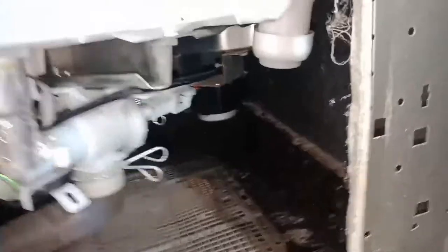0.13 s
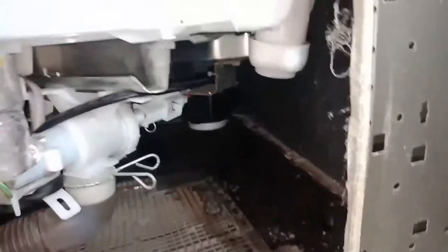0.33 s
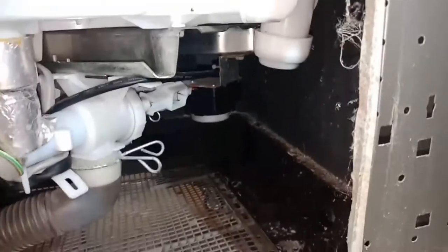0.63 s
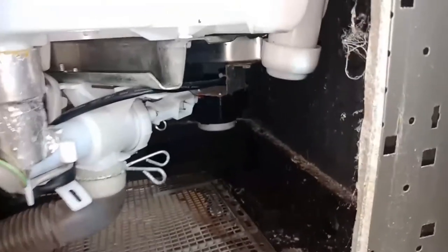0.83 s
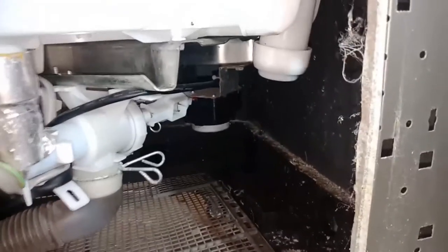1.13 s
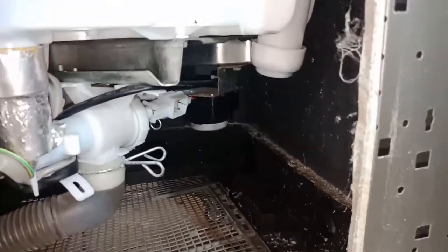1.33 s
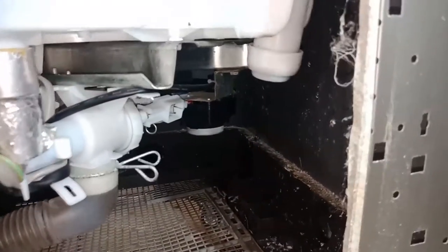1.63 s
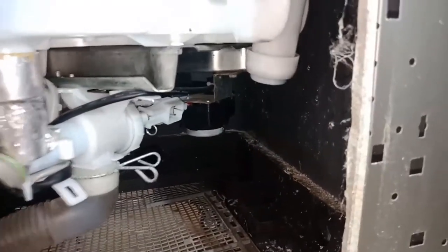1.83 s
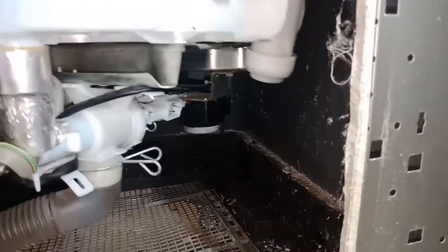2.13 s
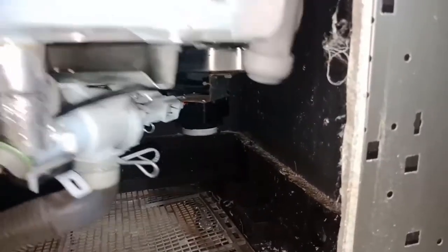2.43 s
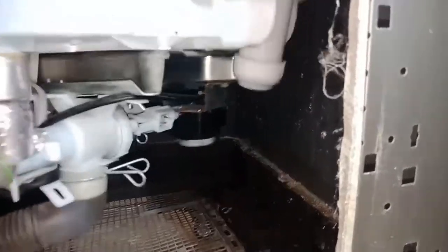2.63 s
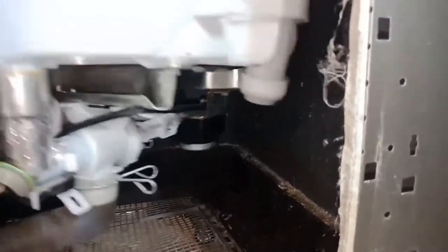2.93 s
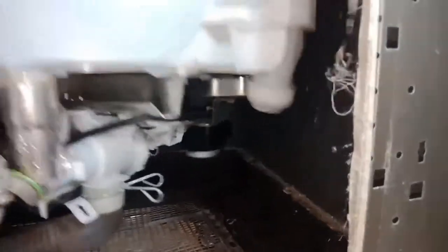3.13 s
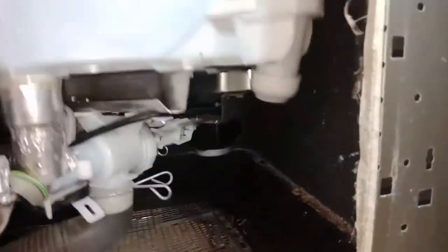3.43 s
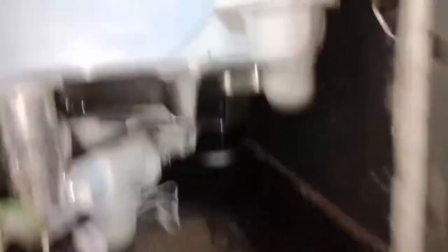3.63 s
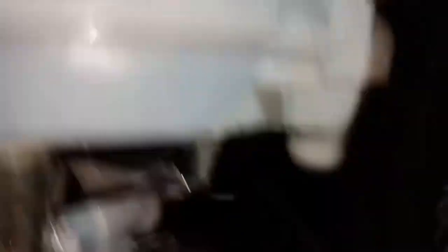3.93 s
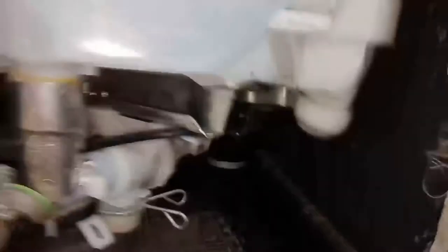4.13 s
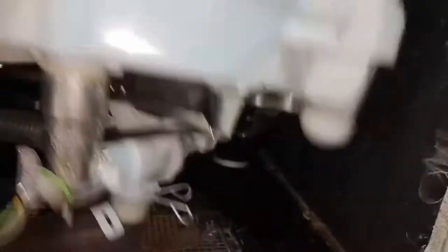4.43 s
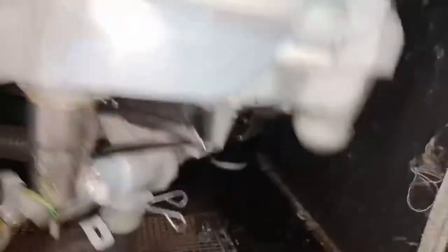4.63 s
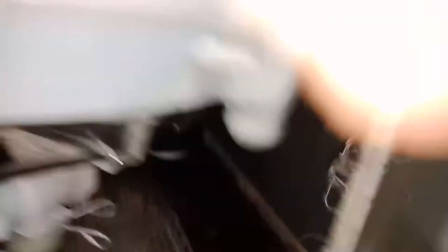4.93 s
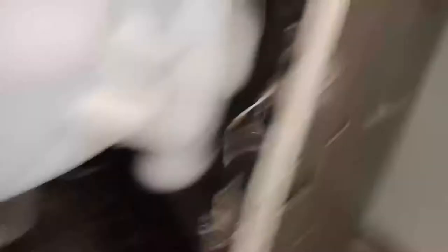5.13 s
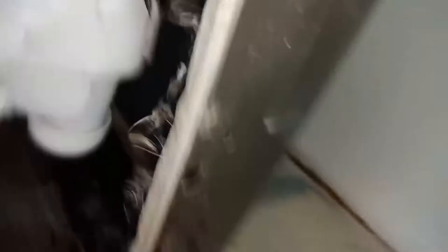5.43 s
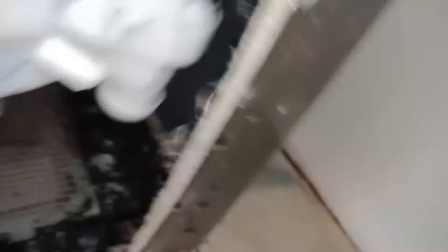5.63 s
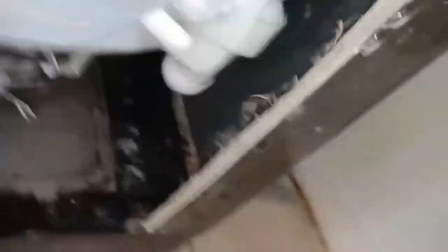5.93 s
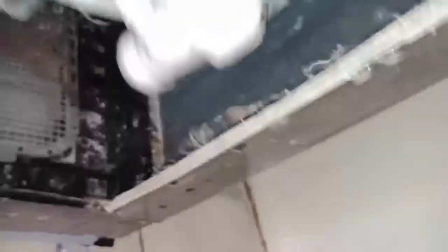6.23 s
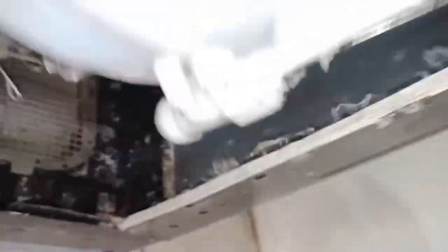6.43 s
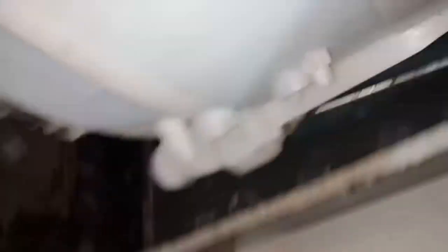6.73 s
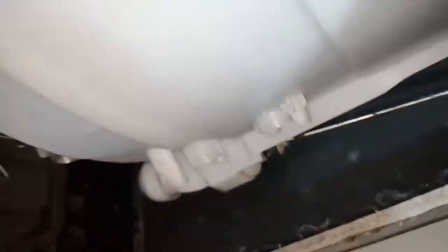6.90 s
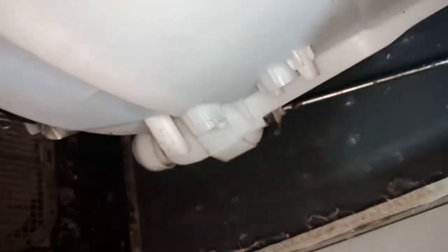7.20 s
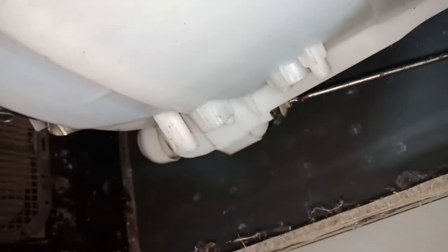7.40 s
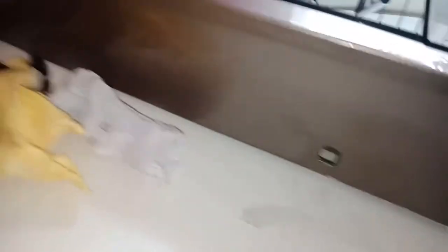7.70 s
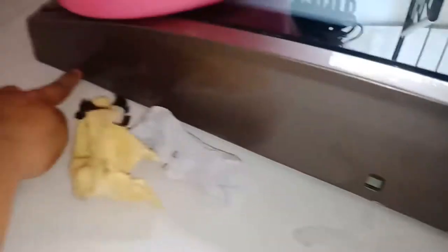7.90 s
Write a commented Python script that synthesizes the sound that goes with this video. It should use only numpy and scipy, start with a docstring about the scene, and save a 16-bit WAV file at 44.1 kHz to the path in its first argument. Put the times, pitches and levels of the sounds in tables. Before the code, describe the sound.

A washing machine spins up with a loose, off-balance drum. A few soft knocks grow into deep booms and metallic clatter as the tub strikes the cabinet faster and faster, with rumble, whirr and motor hum beneath. The knocking then weakens and stops, and the hum fades out. It is heard up close from under the open machine, duller on the left.

```python
"""Booms, knocks and metallic clatter come ever faster as a washing machine spins up with a loose,
off-balance drum, heard from underneath with the panel off. The rotating imbalance forces the tub to
boom into the cabinet, strike its stops and shake loose parts; each impact excites damped modes.
Rumble, whirr and motor hum lie beneath, until the spin dies and the sound fades out.
The left microphone port is shaded and dull."""
import sys
import numpy as np
from scipy import signal
from scipy.fft import rfft, irfft, next_fast_len
from scipy.io import wavfile
from scipy.ndimage import uniform_filter1d

SR = 44100
rng = np.random.default_rng(int(sys.argv[2]) if len(sys.argv) > 2 else 0)


def wav_out(sig):
    """Save sig, one row per channel (or a flat mono array), as 16-bit PCM at SR to the path in sys.argv[1]."""
    wavfile.write(sys.argv[1], SR, np.round(np.clip(np.atleast_2d(sig).T, -1, 1) * 32767).astype(np.int16))


N = 355490

# tub striking its stops: start_s, level_db, thud_hz, ring_over_thud_db
KNOCKS = [(0.402, -31.5, 242.6, -11.5), (0.46, -29, 295, 3), (0.938, -28.5, 454, -4.5),
          (1.002, -31, 245, -6.5), (1.03, -24.5, 350, 11), (1.062, -19, 463, 6), (1.107, -30, 440, 9),
          (1.128, -23.5, 350, 0.5), (1.203, -26.5, 350, 6), (1.273, -33, 350, 6.5), (1.359, -32, 350, 7.5),
          (1.447, -26.5, 358, -10), (1.517, -19.5, 350, -1.5), (1.572, -19.5, 245, 1.5),
          (1.6, -13, 244, 18.5), (1.655, -17, 288, 7), (1.699, -28.5, 350, 7.5), (1.787, -44, 350, 7),
          (1.893, -17.5, 362, -6), (1.974, -16, 270.4, -5), (2.124, -22.5, 328, -7),
          (2.244, -18.5, 452, -5.5), (2.28, -17, 235, 13.5), (2.318, -19, 269.5, 3.5),
          (2.426, -18.5, 353, -1.5), (2.508, -16.5, 360.2, -9.5), (2.531, -17, 350, 12),
          (2.581, -19.5, 257, 6.5), (2.698, -22.5, 285, -3.5), (2.792, -20, 255.5, 2),
          (2.921, -23.5, 352, -6), (2.81, -18, 257, -3), (3.017, -19, 451, -1.5), (3.057, -23, 350, 11.5),
          (3.146, -20, 350, 2.5), (3.2, -22, 257, -2), (3.228, -20.5, 470, -4.5), (3.265, -18.5, 257, 11.5),
          (3.346, -26, 350, 10.5), (3.398, -20.5, 473, -1.5), (3.425, -19.5, 250, 2), (3.535, -24, 350, 3),
          (3.594, -17.5, 257, 3.5), (3.642, -21, 257, 0.5), (3.717, -20, 343, 9.5), (3.77, -15, 354, 4.5),
          (3.803, -14, 257, -20), (3.887, -20.5, 373, 5.5), (3.935, -15.5, 350, 0), (3.97, -12, 257, -21.5),
          (4.048, -25, 257, 7.5), (4.125, -16, 257, -20), (4.204, -20.5, 499, 15.5), (4.252, -20, 388, 13),
          (4.275, -13.5, 262.5, -7), (4.353, -19, 257, 7.5), (4.413, -15, 257, -4), (4.497, -27, 287, 4.5),
          (4.566, -12, 336, 21), (4.693, -21.5, 500, 9.5), (4.714, -17, 350, 11), (4.81, -21, 350, 16),
          (4.836, -11.5, 367, 3.5), (4.964, -11.5, 380, 6), (5.09, -17, 376, 1), (5.214, -15.5, 431, -5.5),
          (5.328, -15, 440, -7.5), (5.448, -10.5, 431, -8), (5.51, -22, 350, 7.5), (5.565, -10, 390.6, -9),
          (5.592, -19, 257, -9.5), (5.752, -27.5, 350, 9.5), (5.626, -23, 350, 10.5),
          (5.688, -14, 440, -15), (5.805, -16, 389.3, -6), (5.872, -24, 404.5, 14), (5.93, -12, 335, -4.5),
          (6.003, -25, 350, 12.5), (6.058, -13, 342, -4.5), (6.135, -19, 322, 9), (6.196, -15, 315.4, -6.5),
          (6.225, -25.5, 257, -22), (6.269, -25, 350, 11.5), (6.346, -20, 325, -5.5), (6.37, -23, 258, -24),
          (6.405, -22, 255, -20), (6.434, -18.5, 249.6, 2), (6.507, -18, 254.7, -7.5),
          (6.621, -24, 377, -2), (6.741, -29, 236, -18), (6.797, -26.5, 374, -22),
          (6.881, -22.5, 257.6, -13), (7.035, -34, 350, 9), (7.1, -29.5, 350, 5.5), (7.24, -38.5, 440, -4)]
# softness of the landing: time_s, rise_share of a knock's length
KNOCK_RISE = [(1, 0.21), (2, 0.37), (3, 0.1933), (4.4, 0.29), (4.6, 0.17), (5.1, 0.14), (5.4, 0.7),
              (6.2, 0.61), (7, 0.293)]
# where the tub rings as the listener moves: time_s, pitch_hz
TUB_RING = [(1, 778), (3.5, 720), (4, 670), (5.1, 690), (5.45, 992), (6.4, 954), (7, 680)]
def tub_knocks(slow_ms=42.25, fast_ms=13.17, crossover_turns_per_s=7.1):
    """Impact excitation: contact time falls at high speed, and shorter, sharper contacts ring more."""
    s, db, thud_hz, ring_db = np.transpose(KNOCKS)
    ms = fast_ms + (slow_ms - fast_ms) / (1 + (spin(s)[0] / crossover_turns_per_s) ** 12)
    ms *= 2 ** (-.045 * np.clip(ring_db + 4, -6, 14))
    ring_hz = at_time(TUB_RING, s) * 2 ** (.05 * rng.standard_normal(len(s)))
    rise = np.clip(at_time(KNOCK_RISE, s) * 2 ** (-.18 * np.maximum(ring_db, 0)), .05, .9)
    swing = .16 * gain_of(np.clip(-.6 * ring_db, -3, 9))  # dull knocks keep firmly to their pitch
    return blows(np.transpose([s, db, ms, thud_hz, ring_hz, ring_db]), knock_spectrum, rise,
                 tail=.55, impact=4.9, grit_db=5, ripple_db=2, swings=swing)


def knock_spectrum(hz, thud_hz, ring_hz, ring_db):
    """Modal response: the modes next to the contact lead a low thud and a higher ring."""
    thud = .84 * body(hz) + 1.84 * mode(hz, thud_hz, 28.4 * (thud_hz / 257) ** 2.2)
    thud *= near(hz, thud_hz, np.clip(.94 + ring_db / 40, .3, .76))
    ring = (body(hz) + 2.9 * mode(hz, ring_hz, 45 * (ring_hz / 700) ** 6.6)) * near(hz, ring_hz, 1)
    return thud / np.linalg.norm(thud) + gain_of(ring_db) * ring / np.linalg.norm(ring)


# tub booming into the cabinet: start_s, level_db, pitch_hz
BOOMS = [(0.454, -33, 120.4), (0.602, -33, 90.8), (0.847, -30.5, 158.2), (1.014, -35.5, 148.3),
         (1.306, -26.5, 126.5), (1.443, -22.5, 119.7), (1.551, -14.5, 92), (1.865, -21.5, 167),
         (1.945, -13, 118.6), (2.276, -14.5, 131.8), (2.559, -17, 161), (2.806, -15, 177.7),
         (3.037, -16.5, 100.4), (3.229, -18.5, 129.3), (3.354, -20.5, 125), (3.446, -15, 122.3),
         (3.629, -18, 117.7), (3.797, -19, 116.3), (3.965, -19, 128.4), (4.129, -19.5, 136.4),
         (4.28, -17.5, 140), (4.424, -19, 152), (4.52, -21.5, 95.3), (4.7, -22.5, 177),
         (5.568, -19.5, 180.6), (6.351, -26, 111.8), (6.529, -19, 112.3), (6.727, -23.5, 100.8)]
def cabinet_booms(turn_share=.1905):
    """Panel resonance: one panel leads the lowest modes, in booms that shorten with the turn period."""
    def spectrum(hz, pitch_hz):
        return body(hz) * near(hz, 116, .74) + 1.3 * mode(hz, pitch_hz, 24) * near(hz, pitch_hz, .15)

    s, db, pitch_hz = np.transpose(BOOMS)
    ms = 1000 * turn_share / spin(s)[0]
    return blows(np.transpose([s, db, ms, pitch_hz]), spectrum, rises=.27,
                 tail=.49, impact=2.3, grit_db=-1, ripple_db=.5, swings=.06)


# loose metal and plastic parts colliding: start_s, level_db, treble_db
CLATTERS = [(1.123, -31, -24), (1.274, -31.5, -10.5), (1.358, -28, -9), (1.576, -23.5, -12.5),
            (1.644, -25, -32.5), (1.786, -26, -13.5), (1.968, -16.5, -16), (2.1, -33.5, -1),
            (2.159, -23, -14.5), (2.25, -23.5, -13.5), (2.29, -24, -11), (2.324, -21, -21.5),
            (2.425, -28, -4), (2.532, -25.5, -13), (2.569, -20.5, -14.5), (2.687, -22, -3.5),
            (2.79, -23.5, -12), (2.82, -20, -11), (2.926, -22.5, -6), (3.046, -24, -12),
            (3.075, -21, -21.5), (3.143, -27, -4.5), (3.226, -20.5, -5.5), (3.346, -25, -3),
            (3.425, -22.5, -6), (3.53, -26, -4), (3.635, -22, -11), (3.708, -28.5, -1.5), (3.826, -23, -12),
            (3.882, -26, -6), (3.974, -23.5, -8.5), (4.05, -25, -8.5), (4.11, -27, -4.5),
            (4.203, -24.5, -4), (4.268, -25, -1.5), (4.352, -21, -4.5), (4.414, -24, -2),
            (4.494, -22.5, -5.5), (4.567, -23, 1), (4.635, -32, -6.5), (4.693, -25.5, -6.5),
            (4.714, -25, -1), (4.769, -24.5, -6), (4.837, -18, -2.5), (4.899, -30.5, -5.5),
            (4.966, -19.5, -2.5), (5.03, -30, -4.5), (5.091, -20.5, -2.5), (5.148, -28.5, -4),
            (5.213, -19.5, -1.5), (5.27, -29.5, 0.5), (5.332, -20, -1.5), (5.446, -20, -6.5),
            (5.561, -24, -6.5), (5.685, -25, -5.5), (5.804, -21.5, -5.5), (5.895, -29.5, -2.5),
            (5.928, -26.5, -8.5), (6.123, -28, -6), (6.204, -28, -6.5), (6.264, -27.5, -10),
            (6.45, -36, -10.5), (6.501, -23, -4), (6.628, -31.5, -10), (6.882, -26.5, -5.5)]
# limit on a clatter's nominal length: time_s, length_ms
LONGEST_CLATTER = [(1.4, 14), (2, 56), (6.5, 55), (6.7, 27.4)]
# parts chattering on after a blow: time_s, force_share
DRAG = [(1.4, 0.065), (2, 0.19), (4.2, 1), (5, 0.44), (6.4, 0.38), (6.9, 0.57)]
def clatters(usual_ms=27, halvings_per_db=.24):
    """Contact chatter: loose parts land either short and hard or long and dragging."""
    s, db, treble_db = np.transpose(CLATTERS)
    ms = usual_ms * 2 ** (halvings_per_db * (spin(s)[1] - db))
    ms = np.clip(ms, 4, at_time(LONGEST_CLATTER, s))
    rise = np.maximum(.08 - .87 * (treble_db + 9), at_time(KNOCK_RISE, s) ** 3 + .05)  # dull lands softly
    return blows(with_part_pitch(s, db, ms, treble_db), clatter_spectrum, rise,
                 tail=1, impact=.77, grit_db=1.5, ripple_db=2.5, drags=at_time(DRAG, s))


def with_part_pitch(s, db, ms, treble_db, low_hz=1320, high_hz=4500):
    """Selective excitation: each blow rings a random part, higher for brighter blows."""
    height = np.clip(.6 * rng.random(len(s)) ** 1.86 + (treble_db + 11) / 30, 0, 1)
    return np.transpose([s, db, ms, treble_db, low_hz * (high_hz / low_hz) ** height])


# broad spectrum of the loose parts: frequency_hz, gain_db
PARTS = [(700, -30), (1200, 1.5), (1800, -3.5), (2300, -5), (3200, -15), (4200, -15), (5600, -19.5),
         (15000, -31.5)]
# thin panels that every clatter rings: pitch_hz, gain_db
PANELS = [(1450, -4.5), (1900, -7), (2280, -2), (2900, -4.5), (3300, -1.5)]
def clatter_spectrum(hz, treble_db, part_hz):
    """Broadband excitation: harder blows carry more treble; one part, the panels and the tub resonate."""
    tilt_db = (treble_db + 8.5) * 1.22 * np.clip(np.log2((hz + 1) / 2200) / .51, 0, 1)
    panels = sum(gain_of(db) * mode(hz, f * (part_hz / 2400) ** .05, 45) for f, db in PANELS)
    resonances = 1 + .59 * mode(hz, part_hz, 220) + panels
    tub = 3.24 * body(hz) * near(hz, 843, .3)
    return gain_of(at_frequency(PARTS, hz) + tilt_db) * resonances + tub


def small_rattles(count=140, per_turn=3.1, length_ms=9, end_s=6.5):
    """Poisson process: random small collisions grow denser and brighter with drum speed."""
    t = np.linspace(SPIN[0][0], SPIN[-1][0], 700)
    drum_turns = np.cumsum(spin(t)[0]) * (t[1] - t[0])
    gap, weakness = rng.random((count, 2)).T
    s = np.interp(np.cumsum(-np.log(1 - gap)) / per_turn, drum_turns, t)
    speed, usual_db = spin(s)
    db = usual_db - 4 - 8 * weakness - 99 * (s >= end_s)
    rows = with_part_pitch(s, db, np.full(count, length_ms), treble_db=-21 + 2.5 * speed)
    return blows(rows, clatter_spectrum, rises=.25,
                 tail=1, impact=1.6, grit_db=-2.5, ripple_db=-4.5, size=2048)


# a small metal part being struck: start_s, level_db, pitch_hz
PINGS = [(1.773, -32.5, 3990), (2.691, -31, 3780), (3.23, -27, 3800), (3.427, -29.5, 3780),
         (4.265, -28.5, 5150), (4.693, -34, 5500), (4.825, -34.5, 5700), (4.955, -34.5, 5436),
         (5.203, -36, 5472), (5.334, -29.5, 4450)]
def metal_pings(length_ms=7.6, width_hz=260):
    """Damped vibration: a single high mode gives a short, bright ring."""
    def spectrum(hz, pitch_hz):
        return mode(hz, pitch_hz, width_hz) * near(hz, pitch_hz, .36)

    return blows([(s, db, length_ms, hz) for s, db, hz in PINGS], spectrum, rises=.22,
                 tail=.46, impact=2.2, grit_db=3.5, ripple_db=-4.5, size=2048)


# the drum's spin: time_s, speed_turns_per_s, usual_clatter_db
SPIN = [(0.3, 1.43, -45), (1.3, 1.98, -32.5), (1.9, 3.14, -24.5), (2.6, 2.6, -25.5), (3.4, 5.73, -24.5),
        (4.2, 6.9, -24), (4.7, 7.7, -25), (5.5, 9.4, -24), (6.101, 7.6, -30.5), (6.502, 6.5, -33),
        (6.849, 7.2, -28), (6.95, 6.6, -55.5)]
def spin(s):
    """Rotating imbalance: the drum's speed and the usual clatter level at times s."""
    times, speed, usual_db = np.transpose(SPIN)
    return np.interp(s, times, speed), np.interp(s, times, usual_db)


def blows(rows, spectrum, rises, tail, impact, grit_db, ripple_db, drags=0, swings=0, size=8192):
    """Source and filter: bursts of uneven contacts drive a spectrum; rises and tail are length shares."""
    out = np.zeros((2, N + size))
    t, hz = np.arange(size) / SR, np.fft.rfftfreq(size, 1 / SR)
    shapes = [np.broadcast_to(v, len(rows)) for v in (rises, drags, swings)]
    noises = rng.standard_normal((len(rows), 4, size))
    for row, rise, drag, swing, (direct, diffuse, grit, parts) in zip(rows, *shapes, noises):
        start_s, level_db, ms, *tone = row
        length_s = ms / 1000
        attack = 1 - np.exp(-(t / length_s / rise) ** 2)
        decay = np.exp(-t / length_s / tail) + drag * np.exp(-(t / .04) ** 3)  # chatter, then lift-off
        force = attack * decay * gain_of(grit_db * smooth(grit, 64))  # contacts come in 1.5 ms clumps
        first_contact = np.arange(size) == round(rise * length_s * SR)
        impulse = impact * np.exp(-1.5 * rise) * np.sqrt(ms) * first_contact
        bounce = swing * np.cos(2 * np.pi * tone[0] * t + grit[0])  # in time with the leading mode
        ripple = gain_of(ripple_db * smooth(parts[:len(hz)], 24))  # each blow shakes other parts
        drive = rfft((direct + impulse + bounce) * force)
        spectra = ports(drive, rfft(diffuse * force), hz, start_s)
        pair = irfft(spectra * spectrum(hz, *tone) * ripple)
        power = uniform_filter1d(pair.mean(0) ** 2, max(round(length_s * SR), 1))
        start = max(round((start_s - .4036 * rise * length_s) * SR), 0)
        out[:, start:start + size] += pair * gain_of(level_db) / np.sqrt(power.max())
    return out[:, :N]


# modes of cabinet and tub: pitch_hz, width_hz, gain_db
BODY_MODES = [(97, 48, 0), (124, 67, -4.5), (164.4, 19.5, 2), (257, 25, 3), (350, 39, -1.5), (440, 31.3, 4),
              (574, 287, -5), (690, 35, 1.5), (757, 36, -6.5), (915, 86, -2), (961, 120, -6),
              (1212, 160, -8)]
def body(hz):
    """Modal superposition: neighbouring modes swing in opposite sense."""
    return sum((-1) ** k * gain_of(db) * mode(hz, f, w) for k, (f, w, db) in enumerate(BODY_MODES))


# relative levels between blows: time_s, rumble_db, drone_db, ring_db, whirr_db, left_treble_db
RUNNING = [(0, -34, -42, -42, -39, -17), (.75, -37, -40, -39.5, -36.5, -15),
           (1.099, -23.5, -29, -28.5, -33.5, -16), (1.4, -38.5, -31.5, -35.5, -33.5, -16),
           (1.701, -25.5, -23.5, -28.5, -29, -16), (2.399, -21.5, -22.5, -22, -32.5, -15.5),
           (3.2, -20.5, -22.5, -25.5, -31.5, -16.5), (4.202, -30, -30, -19.5, -32, -15),
           (5.05, -32.5, -30, -29.5, -29.5, -15.5), (5.498, -27, -25, -23.5, -26, -7.5),
           (6.1, -32, -24, -24.5, -28.5, -11.5), (6.698, -32, -22, -28, -34.5, -13.5),
           (6.97, -31.5, -28.5, -36, -40.5, -9.5), (7.301, -42.5, -44.5, -47.5, -47.5, -11),
           (7.71, -47.5, -46, -52.5, -47.5, -9), (7.8, -53.5, -63, -63.5, -59.5, -5),
           (7.87, -70, -76, -78.5, -72.5, -0.5)]
# spectrum of the small parts' whirr: frequency_hz, gain_db
WHIRR = [(700, -27.5), (1200, -1), (1500, 1.5), (1800, 1), (2050, -3.5), (2500, -4.5), (3200, -4.5),
         (3900, -10.5), (4700, -12), (5600, -16), (15000, -15)]
# weight of the whirr's top treble: time_s, gain_db
TOP_TREBLE = [(3.8, -4.5), (5.2, 6), (5.9, 7), (6.6, 7.5)]
def running_noise():
    """Forced vibration: the drum keeps the cabinet rumbling, the tub droning and small parts whirring."""
    frames, hz = N // 128 + 9, np.fft.rfftfreq(1024, 1 / SR)[:, None]
    t = np.arange(frames) * 128 / SR
    turning = t < 7
    a, b, c, d, patches = rng.standard_normal((frames, 513, 5)).T
    patches = uniform_filter1d(uniform_filter1d(patches, 14, 0), 12, 1)  # drift in pitch and time
    patch_db = np.interp(hz, [800, 3000], [2.9, 1.6]) * np.where(turning, 1, .5) * patches / patches.std()
    rumble, drone, ring = (abs(body(hz)) * near(hz, *band) for band in [(110, .44), (320, .63), (850, 1)])
    ring = ring / np.linalg.norm(ring) + .25 * abs(mode(hz, at_time(TUB_RING, t), 120))
    whirr = gain_of(at_frequency(WHIRR, hz) + at_time(TOP_TREBLE, t) * (hz > 7000))
    rumble_db, drone_db, ring_db, whirr_db = (at_time(RUNNING, t, column) for column in (1, 2, 3, 4))
    whirr_db += 1.1 * smooth(rng.standard_normal(frames), 3) * turning  # small parts tick
    # parts hang free just before each clatter
    lifted = np.minimum(sum(np.exp(-((t - s + .017) / .0062) ** 2) for s, *_ in CLATTERS), 1)
    layers = [(rumble, rumble_db), (drone, drone_db),
              (ring, ring_db - 12 * lifted), (whirr, whirr_db - 6.9 * lifted)]
    power = sum((gain_of(db) * shape / np.linalg.norm(shape, axis=0)) ** 2 for shape, db in layers)
    spectra = ports(a + 1j * b, c + 1j * d, hz, t) * np.sqrt(power) * gain_of(patch_db)
    return 1.673 * signal.istft(spectra, nperseg=1024, noverlap=896)[1][:, :N]


# fade of the hum once the listener is outside: time_s, relative_db
HUM_FADE = [(6.503, 1.3), (7.2, -16.5), (7.72, -17.5), (7.82, -40)]
# motor hum: fundamental_hz, then relative_db of each harmonic
HUM_HZ, HUM = 118.6, [-42, -42, -46, -46, -54.5, -58, -63, -61.5]
def motor_hum():
    """Harmonic series: the motor hums on wavering multiples of twice the mains frequency."""
    t = np.arange(N) / SR
    tones = np.zeros(N)
    for k, db in enumerate(HUM, start=1):
        waver = smooth(rng.standard_normal(N), 1600)
        tones += gain_of(db + 2.5 + 5.8 * waver) * np.sin(2 * np.pi * k * HUM_HZ * t + 1.93 * waver)
    return tones * gain_of(.97 * at_time(HUM_FADE, t))


def dull_tick(start_s=7.8105, level_db=-33, pitch_hz=330):
    """Heavy damping: two quick swings make one dull tick as the sound drops away."""
    t = np.maximum(np.arange(N) / SR - start_s, 0)
    return gain_of(level_db) * np.sin(2 * np.pi * pitch_hz * t) * np.exp(-pitch_hz * t)


# likeness of the two ports: frequency_hz, coherence_ratio (capped at 1)
COHERENCE = [(60, 5.5), (150, 0.5), (260, 0.75), (760, 0.77), (1200, 0.25), (1800, 0.24)]
# shading of the left port: frequency_hz, left_over_right_db
SHADE = [(60, -1), (760, -2.5), (1170, -7.5), (1790, -19.5), (2730, -16.5), (6380, -38.5), (9000, -22)]
def ports(direct, diffuse, hz, s, usual_treble_db=-16):
    """Acoustic shadow: the ports agree in the bass; the left hears less treble, a little later."""
    coherence = np.clip(at_frequency(COHERENCE, hz), -1, 1)
    lift_db = (at_time(RUNNING, s, column=5) - usual_treble_db) * np.clip(np.log2((hz + 1) / 700), 0, 1)
    lag = np.exp(-.5j * np.clip(hz / 260, 0, 1))
    left = coherence * direct + np.sqrt(1 - coherence ** 2) * diffuse
    return np.array([left * lag * gain_of(at_frequency(SHADE, hz) + lift_db), direct])


def mode(hz, centre_hz, width_hz):
    """Resonance: the complex response of one mode, gain 1 at its centre."""
    return 1 / (1 + 2j * (hz - centre_hz) / width_hz)


def near(hz, centre_hz, octaves):
    """Excitation bandwidth: a bell on the octave scale picks the modes a force reaches."""
    return np.exp(-.5 * (np.log2((hz + 1) / centre_hz) / octaves) ** 2)


def smooth(noise, size):
    """Low-pass filtering: noise averaged twice over size points, at rms 1."""
    noise = uniform_filter1d(uniform_filter1d(noise, size), size)
    return noise / noise.std()


def gain_of(db):
    """Decibel law: level to amplitude ratio."""
    return 10 ** (np.asarray(db) / 20)


def at_time(table, s, column=1):
    """Linear interpolation over time."""
    columns = np.transpose(table)
    return np.interp(s, columns[0], columns[column])


def at_frequency(table, hz):
    """Interpolation over log frequency."""
    f, value = np.transpose(table)
    return np.interp(np.log(hz + 1), np.log(f + 1), value)


def scene():
    """Superposition: the impacts add to the running noise, the hum and the last tick."""
    impacts = cabinet_booms() + tub_knocks() + clatters() + small_rattles() + metal_pings()
    return impacts + running_noise() + motor_hum() + dull_tick()


# microphone response: frequency_hz, gain_db
MICROPHONE = [(25, -17.5), (55, -15.5), (90, -2.5), (5600, 2), (6300, -8), (7200, -21.5), (9000, -29),
              (15000, -31)]
def record(dry, hiss_db=-70, cutoff_hz=15500):
    """Band-limited transduction: the microphone drops deep bass and high treble and adds faint hiss."""
    size = next_fast_len(N + 4096)
    response = gain_of(at_frequency(MICROPHONE, np.fft.rfftfreq(size, 1 / SR)))
    heard = irfft(rfft(dry, size) * response, size)[:, :N]
    heard = np.tanh(heard / .91)  # the loudest blows overload the input a little
    fade_db = .35 * at_time(HUM_FADE, np.arange(N) / SR)  # the hiss sinks with the hum
    heard += gain_of(hiss_db + fade_db) * rng.standard_normal((N, 2)).T
    lowpass = signal.firwin(1023, cutoff_hz, window=("kaiser", 12), fs=SR)
    return signal.oaconvolve(heard, lowpass[None], "same")


dry = scene()
out = record(dry)
wav_out(out)
```